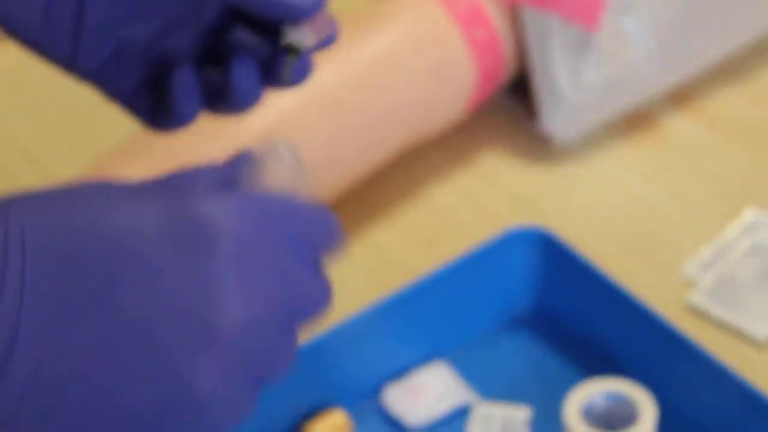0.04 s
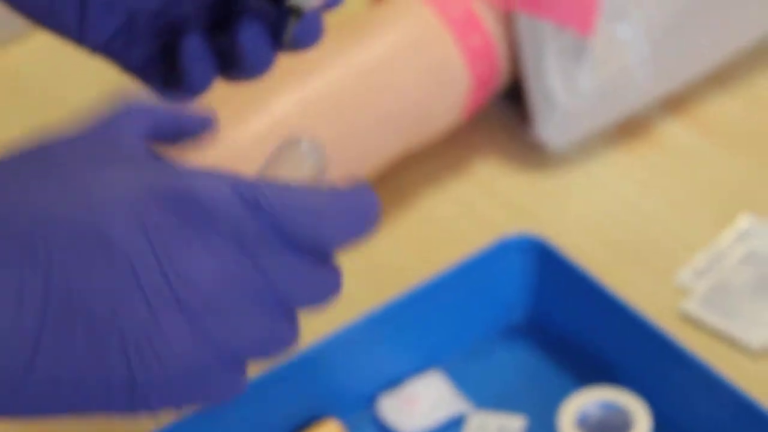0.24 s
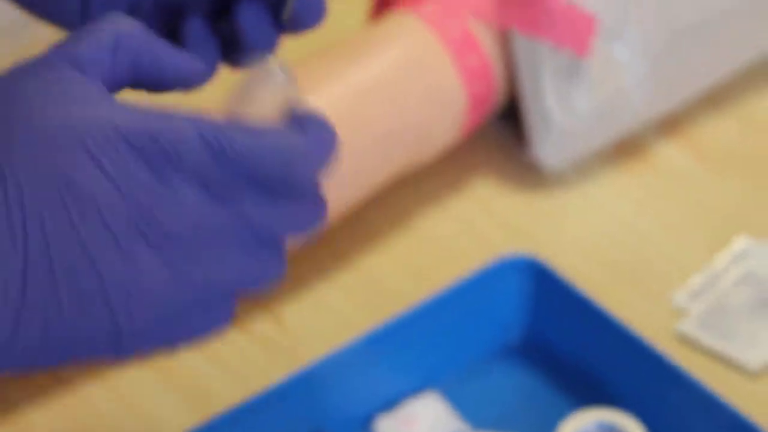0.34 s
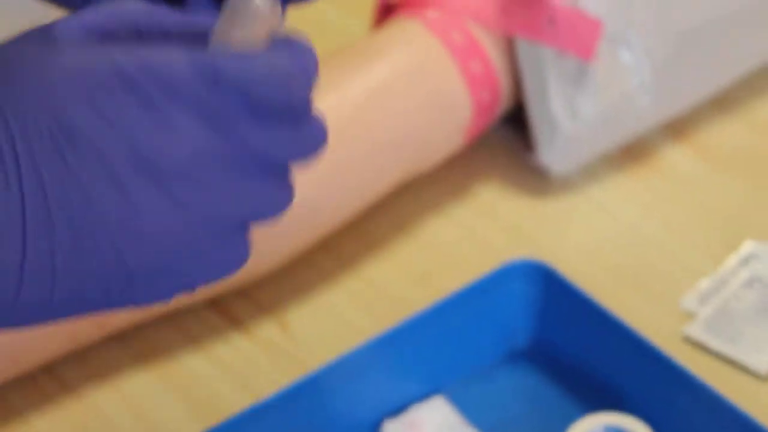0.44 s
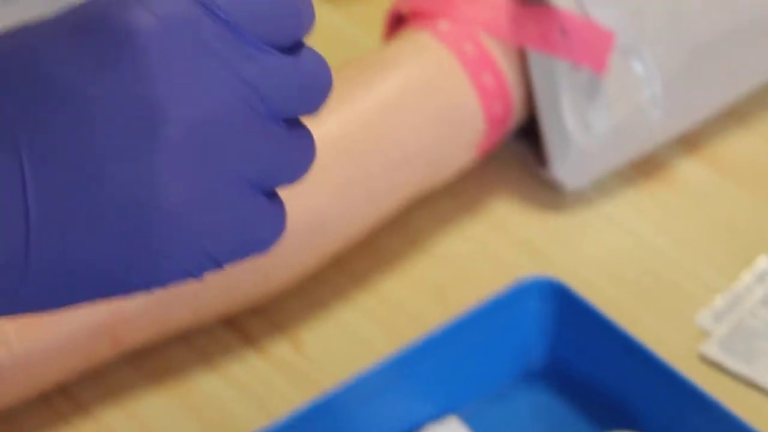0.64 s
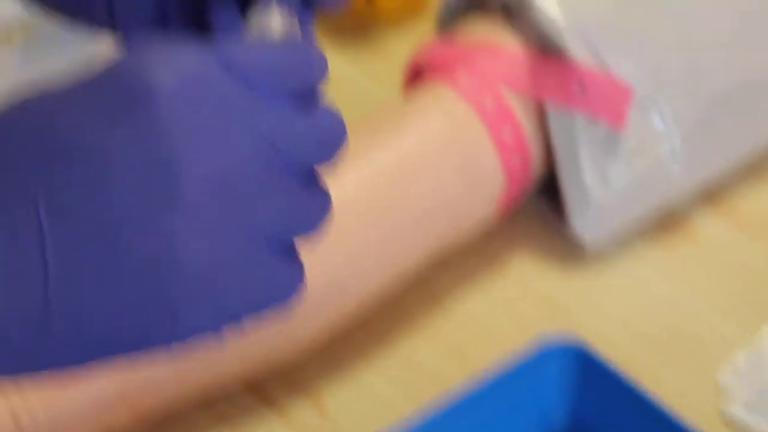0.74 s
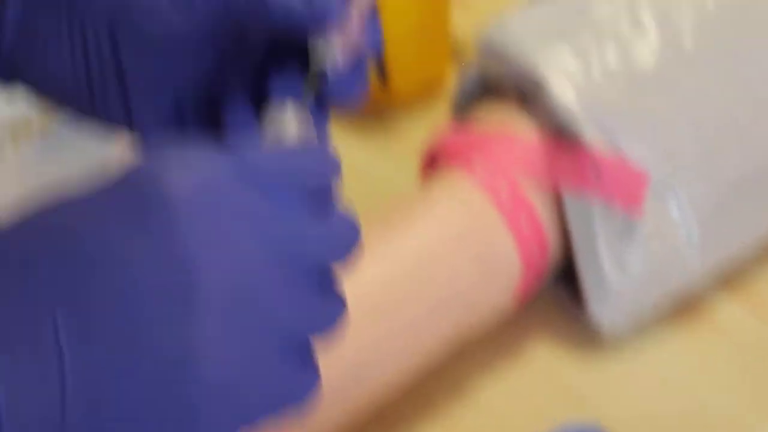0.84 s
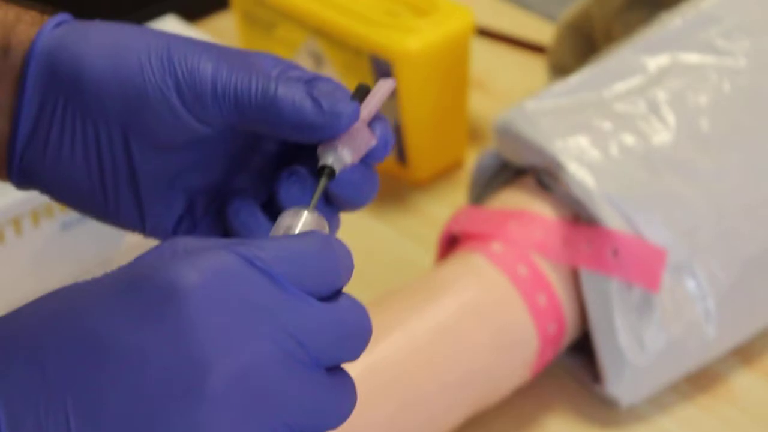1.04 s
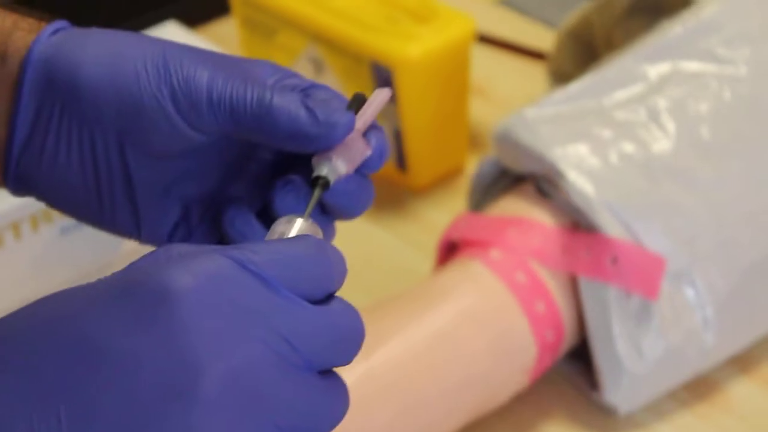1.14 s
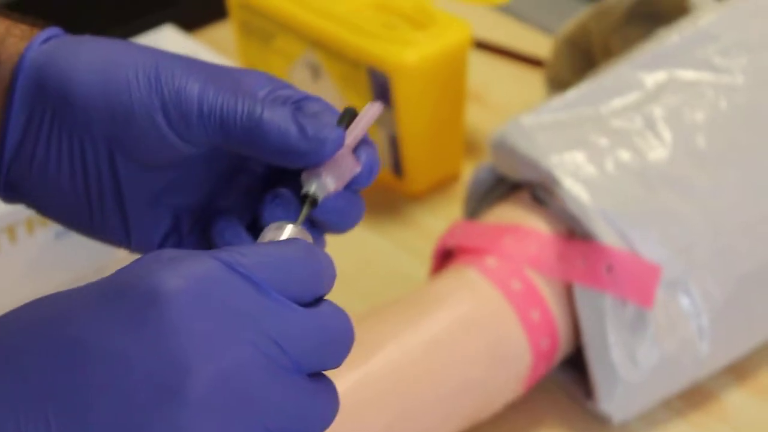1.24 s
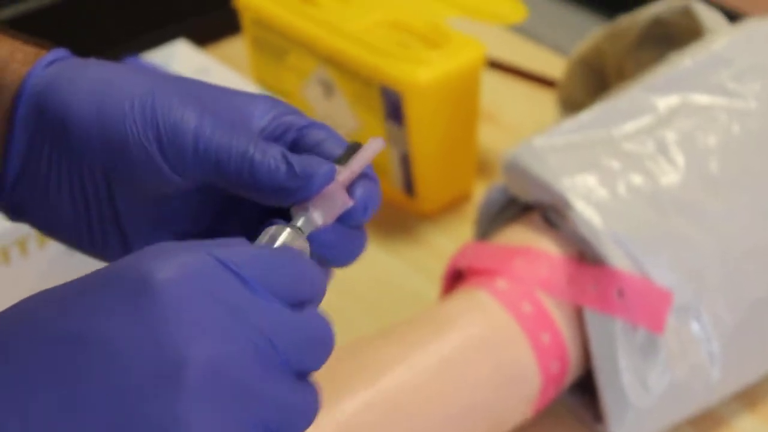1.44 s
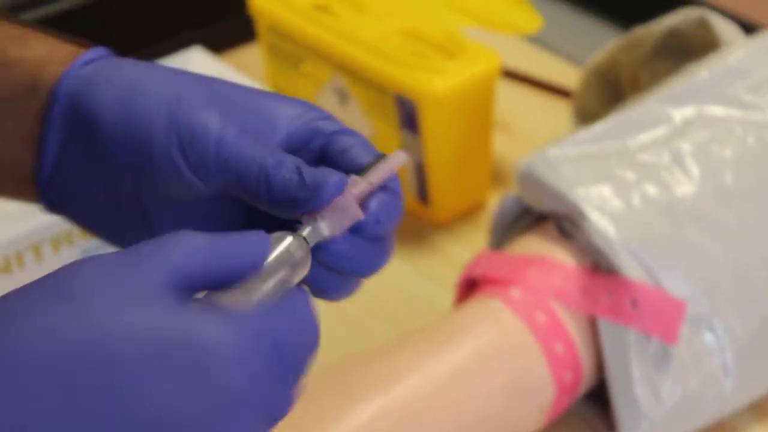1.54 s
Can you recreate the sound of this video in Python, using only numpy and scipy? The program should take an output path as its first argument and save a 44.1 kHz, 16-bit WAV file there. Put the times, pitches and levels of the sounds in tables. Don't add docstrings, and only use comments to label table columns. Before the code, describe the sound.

A small hard plastic part smacks into a plastic tray, very close and overloaded, then bounces in quick cracks to rest; later a faint cap click and soft glove rub, over quiet ventilation and electrical hum indoors.

```python
import sys
import numpy as np
from scipy import signal
from scipy.io import wavfile

SR = 44100
rng = np.random.default_rng(int(sys.argv[2]) if len(sys.argv) > 2 else 0)


def generate_wav(sig):
    pcm = np.round(np.clip(np.atleast_2d(sig).T, -1, 1) * 32767).astype(np.int16)
    wavfile.write(sys.argv[1], SR, pcm)


def amplitude_ratio(level_db):
    exponent = np.asarray(level_db, float) / 20
    return 10 ** exponent


N = 70560

# [f/Hz, level/dB per Hz]
AIR_COLOUR = [(25, -6.5), (70, -18), (135, -10.5), (330, -14.5), (520, -22), (1300, -26.5), (5000, -35),
              (16000, -47)]
# [t/s, level/dB, extra treble/dB]
BACKGROUND_SWELL = [(0, -2, 1), (0.199, -2.5, 1.5), (0.798, -0.5, 0), (1.201, -2.5, 1), (1.6, -2.5, 3.5)]
# [f/Hz, rms level/dB]
HUM_TONES = [(100, -83.5), (200, -72), (300, -68.5), (400, -57.5), (500, -70.5), (1000, -78.5)]
# [f/Hz, fade time/s]
ROOM_FADE = [(200, 1.24), (700, 0.32), (1700, 0.47), (4000, .4), (8000, 0.5), (15000, 0.1)]
# [f/Hz, level/dB]
ROOM_LEVEL = [(200, -23.5), (700, -11), (1700, -23.5), (4000, -23.5), (8000, -23.5), (15000, -27.5)]
# [f/Hz, level/dB, fade time/s]
TRAY_TONES = [(233.6, -44, 0.26), (300, -46, 0.1), (411, -34, 0.16), (520, -35, .07), (611, -38, 0.15),
              (736, -41.5, 0.089), (980, -46.5, 0.048)]
# [f/Hz, level/dB, fade time/s]
PART_TONES = [(1400, -13.5, 0.024), (1700, -8, 0.0084), (2300, -6.5, 0.012), (2900, -6, 0.013),
              (3570, -9, 0.006), (4450, -6.5, .007), (5170, -5, 0.005), (6420, -5, 0.005136),
              (7300, -6, 0.0052), (9020, -13.5, .005), (9440, -16, 0.0013), (11960, -20.5, 0.0024),
              (14300, -19.5, .003)]
# [t/s, peak level/dB, strongest ring f/Hz, brightness/dB per octave, fade time/s]
BOUNCES = [(.2307, 2, 2052, -7, 0.0042), (0.2323, -10, 2580, -3.5, 0.027),
           (0.2342, -10.5, 1700, -11.5, 0.019), (0.2444, -5.5, 2900, 0.5, 0.007),
           (0.2443, -5, 7300, -3, 0.0087), (0.247, -13, 1930, -6.5, .007), (0.2491, -18, 3900, -6, .02),
           (0.3725, -33, 5400, -8, 0.012), (0.379, -33, 8660, -9, 0.0051), (.388, -40, 7800, -2, .015),
           (.4032, -9.5, 4450, -3, 0.01), (.4043, -6.5, 2900, -10, 0.0061), (0.4066, -17, 1400, -7, 0.026),
           (0.4121, -27, 4560, 1, 0.0071), (0.4248, -5.5, 2894, -6.5, 0.0078),
           (0.4311, -25, 1700, -19, 0.024), (0.4906, -25.5, 9180, -8, .012),
           (.4962, -12.5, 2540, 0.5, 0.0062), (0.499, -16.5, 2500, -3, 0.013), (0.503, -18, 1915, 0, 0.036),
           (.5135, -38, 9300, -6, 0.0082), (0.5507, -20, 2300, -5.5, 0.025), (.562, -20, 2050, -6, 0.0067),
           (0.5933, -29.5, 3850, -6, 0.0087)]
# [t/s, peak level/dB, strongest ring f/Hz, brightness/dB per octave, fade time/s]
LATE_CONTACTS = [
    (0.7197, -46, 1400, -10, 0.014),
    (.8063, -45, 6000, -9, .006),
    (.8088, -41, 1633, -7.5, .025),
    (1.3914, -32, 2300, -3.5, 0.0061),
    (1.3954, -29.5, 1530, -10, 0.026),
    (1.3966, -31.5, 3510, -1, 0.018),
    (1.3975, -39.5, 1432, -27, 0.049),
    (1.414, -45.5, 1532, -13.5, 0.066),
    (1.4346, -50, 1450, -12, .035),
    (1.447, -46, 1560, -12, 0.043),
]
# [f/Hz, width/Hz, level/dB]
RUB_COLOUR = [(6500, 1030, -3.5), (7800, 370, 6), (8650, 450, 7), (12700, 1400, -9)]


def at_hz(points, hz):
    table = np.array(points)
    return np.interp(np.log(hz), np.log(table[:, 0]), table[:, 1])


def rms_one(x):
    return x / np.sqrt(np.mean(x ** 2))


def drift(rate_hz):
    knots = rng.standard_normal(200 + int(N / SR * rate_hz) * 0)
    return np.interp(np.arange(N) / SR * rate_hz, np.arange(len(knots)), knots)


def ring(push, hz, t60):
    shrink, turn = amplitude_ratio(-60 / (t60 * SR)), 2 * np.pi * hz / SR
    return signal.lfilter([0, np.sin(turn)], [1, -2 * shrink * np.cos(turn), shrink ** 2], push + 1e-18)


def bands(length, shape):
    edges = 22 * 2 ** np.arange(0, 10, .5)
    white = rng.standard_normal((2, length))
    total = np.zeros(length)
    for k, (low, high) in enumerate(zip(edges, edges[1:])):
        band = signal.butter(2, [low, high], "band", fs=SR, output="sos")
        total += signal.sosfilt(band, white[k % 2]) * shape(np.sqrt(low * high))
    return total


def ventilation():
    s, _, treble_db = np.transpose(BACKGROUND_SWELL)
    treble = np.interp(np.arange(N) / SR, s, treble_db)

    def loudness(hz):
        octaves_up = np.clip(np.log2(hz / 3000), 0, 2)
        return amplitude_ratio(at_hz(AIR_COLOUR, hz) + 0.99 * drift(11) + treble * octaves_up)

    return amplitude_ratio(-54.5) * rms_one(bands(N, loudness))


def mains_hum():
    t = np.arange(N) / SR
    hum = np.zeros(N)
    for hz, db in HUM_TONES:
        loudness = np.sqrt(2) * amplitude_ratio(db - 0.46 * drift(3.2))
        hum += loudness * np.sin(2 * np.pi * (hz * t + rng.random()))
    return hum


def background():
    s, swell_db, _ = np.transpose(BACKGROUND_SWELL)
    return (ventilation() + mains_hum()) * amplitude_ratio(np.interp(np.arange(N) / SR, s, swell_db))


def glove_rub():
    peak_s, rise_s, fall_s = 1.532, 0.015, 0.056
    t = np.arange(N) / SR - peak_s
    white = rng.standard_normal(N)
    hiss = sum(amplitude_ratio(db) * rms_one(ring(white, hz, 2.7 / width)) for hz, width, db in RUB_COLOUR)
    swell = np.where(t < 0, np.exp(-(t / rise_s) ** 2), np.exp(-np.abs(t) / fall_s))
    return amplitude_ratio(-60.5 + 2.7 * drift(180)) * rms_one(hiss) * swell


def room(near_sound, far_sound):
    t = np.arange(SR // 2 + SR // 4) / SR
    near_t60_s, near_db, near_gap_s, tail_rise_s = .065, -8.5, .003, 0.012

    def fade(t60):
        return amplitude_ratio(-60 * t / t60) / np.sqrt(t60 * SR / 14)

    def tail_shape(hz):
        return amplitude_ratio(at_hz(ROOM_LEVEL, hz) + 13) * fade(at_hz(ROOM_FADE, hz)) * np.minimum(t / tail_rise_s, 1)

    tail = bands(len(t), tail_shape)
    near = amplitude_ratio(near_db) * rng.standard_normal(len(t)) * fade(near_t60_s) * (t > near_gap_s)
    return (signal.fftconvolve(near_sound, near) + signal.fftconvolve(far_sound, tail))[:N]


def contact(strongest_hz, tilt_db, t60):
    t = np.arange(SR // 3) / SR
    click = 1. * (t == 0)
    chatter_s, scatter_db = 0.00048, 3
    touch = click + 0.36 * rng.standard_normal(len(t)) * np.exp(-t / chatter_s)
    small_body = signal.butter(4, 1250, "high", fs=SR, output="sos")

    rings = ring(click, strongest_hz, max(t60, .002))
    detune = 1 + .015 * rng.standard_normal()
    for hz, db, decay in PART_TONES:
        luck = rng.standard_normal()
        level_db = db + tilt_db * abs(np.log2(hz / strongest_hz)) + scatter_db * luck
        rings += amplitude_ratio(level_db) * np.sign(luck) * ring(touch, hz * detune, decay)

    noise = rng.standard_normal(len(t))
    broad = rms_one(ring(noise, strongest_hz, 1.5 / strongest_hz) + .2 * noise)
    crack_t60 = min(1.7 * t60, 0.14)
    crack = amplitude_ratio(1.4 * tilt_db - 60 * t / crack_t60) * broad
    rings, crack = signal.sosfilt(small_body, [rings, crack])
    peak = np.abs(rings + crack).max()
    rings, crack = rings / peak, crack / peak

    blunt = ring(click, strongest_hz, 1.3 / strongest_hz) + amplitude_ratio(2 * tilt_db + 3.5) * click
    around = signal.sosfilt(small_body, blunt)
    around *= np.linalg.norm(rings + crack) / np.linalg.norm(around)

    if strongest_hz < 3500:
        for hz, db, decay in TRAY_TONES:
            rings += amplitude_ratio(db + 2 * rng.standard_normal()) * ring(click, hz, decay)
    return np.array([rings, crack, around])


def contacts():
    out = np.zeros((3, N + SR))
    for s, db, strongest_hz, tilt_db, t60 in BOUNCES + LATE_CONTACTS:
        sound = amplitude_ratio(db) * contact(strongest_hz, tilt_db, t60)
        start = int(s * SR)
        out[:, start:start + sound.shape[1]] += sound
    return out[:, :N]


def scene():
    quiet_bed, slide = background(), glove_rub()
    rings, cracks, around = contacts()
    nearby = amplitude_ratio(-2) * rings + amplitude_ratio(5.5) * cracks
    far = amplitude_ratio(-6) * nearby + amplitude_ratio(-2) * around
    return (rings + cracks + room(nearby, far) + quiet_bed + slide)[None]


def roll_off(x):
    return signal.sosfilt(signal.butter(12, 17090, fs=SR, output="sos"), x)


def record(dry):
    flattened = np.clip(dry, -.73, .73)
    no_top = signal.cheby2(8, 45, 17100, fs=SR, output="sos")
    no_rumble = signal.butter(2, 116, "high", fs=SR, output="sos")
    mix = signal.sosfilt(no_rumble, signal.sosfilt(no_top, flattened))
    return roll_off(mix)


dry = scene()
out = record(dry)
generate_wav(out)
```